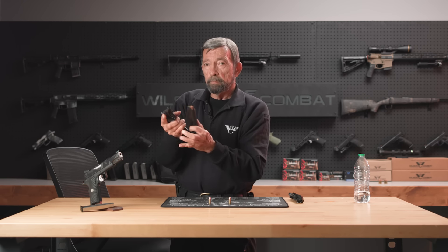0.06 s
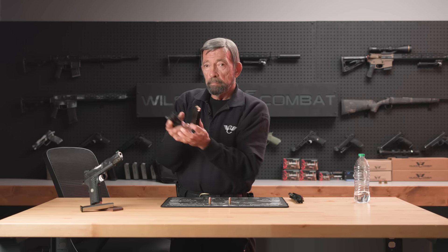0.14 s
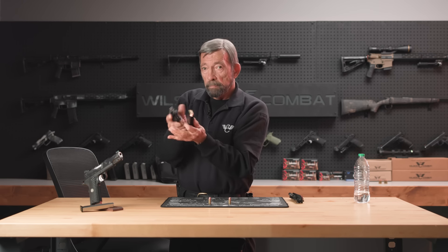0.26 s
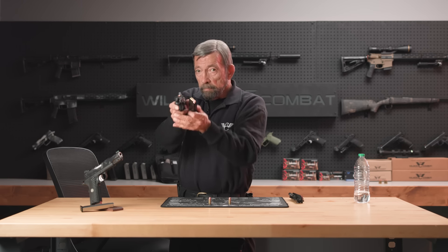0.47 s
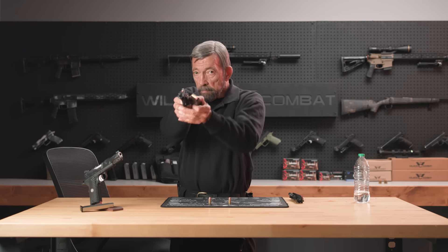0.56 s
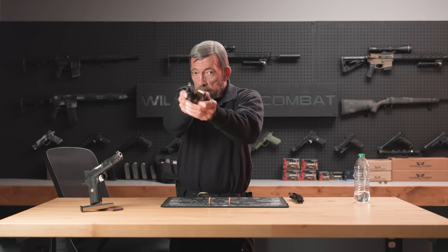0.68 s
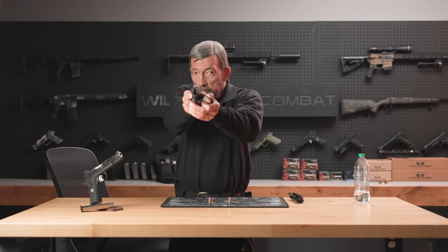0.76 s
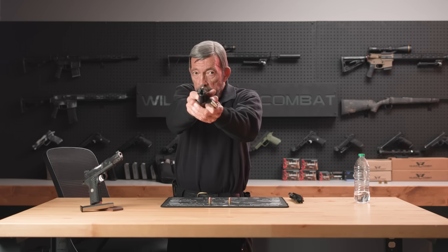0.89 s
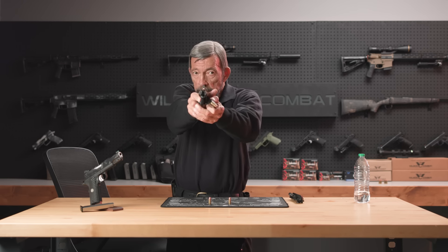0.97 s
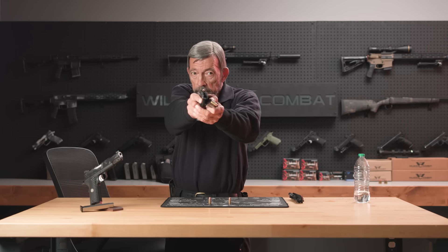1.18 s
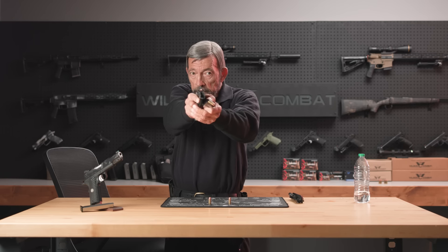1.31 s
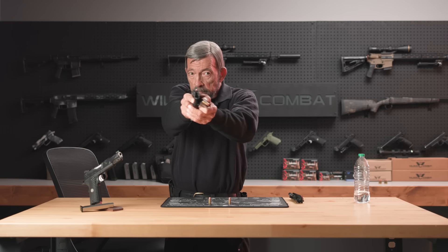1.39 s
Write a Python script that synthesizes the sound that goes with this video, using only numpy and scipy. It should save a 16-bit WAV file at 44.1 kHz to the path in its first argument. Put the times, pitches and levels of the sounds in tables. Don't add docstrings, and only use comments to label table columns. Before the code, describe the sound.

A pistol magazine is pushed in and slapped home with a sharp metallic double clack, indoors

```python
import sys
import numpy as np
from scipy import signal
from scipy.io import wavfile
from scipy.ndimage import uniform_filter1d

SR = 44100
rng = np.random.default_rng(int(sys.argv[2]) if len(sys.argv) > 2 else 0)


def wrap_up_sound(samples):
    columns = np.atleast_2d(samples).T
    tamed = np.clip(columns, -1, 1)
    steps = np.round(tamed * 32767).astype(np.int16)
    wavfile.write(sys.argv[1], SR, steps)


def level_to_linear(level):
    exponent = np.asarray(level, float) / 20
    return 10 ** exponent


N = 63945

# [f/Hz, level/dB]
FLOOR_COLOUR = [(12, -33), (20, -15.5), (74, -2), (228, -26), (410, -11), (446, -15.5), (642, -12.5),
                (698, -15), (16000, -54.5)]
# [f/Hz, t60/s]
HALL_T60 = [(200, .5), (800, 1.025), (2500, 0.81), (5500, 0.78), (9000, 0.48), (15000, 0.38)]
# [f/Hz, level/dB]
HALL_SPECTRUM = [(250, -25), (500, -5.5), (820, 5), (1300, -5), (2100, 2), (3200, 1.5), (6000, 0.5),
                 (8200, -2), (15000, 5.5)]
# [t/s, level/dB]
ARM_MOTION = [(0, -67), (.13, -57), (.3, -57), (.46, -62), (.53, -54), (.63, -56.5), (.72, -60),
              (.87, -60.5), (.93, -62), (.97, -69), (1.2, -71.5), (1.45, -70.5)]
# [f/Hz, level/dB]
RUSTLE_COLOUR = [(350, -35.5), (600, -4), (679, -12.5), (748, -1.5), (1180, -7.5), (8740, -17),
                 (14300, -13.5), (16000, -19.5)]
# [t/s, level/dB]
WEIGHT_SHIFT = [(0, -69), (.12, -59), (.3, -52.5), (.46, -56.5), (.53, -49.5), (.63, -48), (.68, -51),
                (.76, -53.5), (.87, -55), (.95, -56), (1.03, -65), (1.3, -65), (1.45, -60.5)]
# [f/Hz, level/dB]
RUMBLE_COLOUR = [(8.8, -32), (15, 0), (43, -5), (249, -11.5), (409, -8.5), (477, -18.5), (900, -20.5),
                 (1170, -49), (1980, -120)]
# [t/s, level/dB]
SLEEVE_DRAW = [
    (.72, -95),
    (.8, -68.5),
    (.88, -68),
    (.925, -67),
    (.95, -92),
]
# [f/Hz, level/dB]
SLEEVE_DRAW_COLOUR = [(1000, -29.5), (2000, -6.5), (4500, 1), (6500, -4.5), (9000, -14.5), (16000, -13.5)]
# [t/s, peak/dB, length/s]
AIR_PUFFS = [
    (0.142, -33.5, 0.0045),
    (0.189, -36, 0.011),
    (0.2047, -14.5, 0.0024),
    (0.236, -9.5, 0.003),
    (0.309, -35, 0.052),
]
# [t/s, peak/dB, f/Hz, t60/s, start phase/turns]
GRIP_KNOCKS = [(.2045, -9, 420, 0.01, 0.64), (0.203, -13.5, 1463, 0.019, 0.15),
               (.2055, -12, 925, 0.0091, 0.18), (0.2353, -15.5, 340.5, .02, 0.34),
               (0.518, -36.5, 105.6, 0.067, 0.14), (.6028, -33.5, 1530, 0.0095, 0.54),
               (0.6312, -29.5, 1140, 0.0058, 0.1), (0.6321, -31.5, 446, 0.0091, 0.52),
               (.6448, -32, 1480, 0.0091, 0.08), (0.864, -40.5, 50.44, 0.074, 0.19),
               (0.98, -47.5, 168, .03, 0.14), (1.1198, -31.5, 704, 0.005, .1),
               (1.1205, -33, 249, 0.024, 0.76), (0.2144, -18, 950, 0.013, 0.065),
               (1.372, -45.5, 700, 0.026, 0.13)]
# [multiple of fundamental, level/dB]
WELL_HARMONICS = [(1, -1), (2, -10), (3, -14.5), (4, -15.5), (5, -14.5), (6, -9), (7, -16)]
# [t/s, level/dB]
SLIDE_LEVEL = [
    (0, -61),
    (.055, -61),
    (.068, -48),
    (.098, -50),
    (.122, -64.5),
    (.165, -73.5),
    (.19, -44),
    (.2, -41),
    (.205, -79),
]
# [f/Hz, level/dB]
SLIDE_SPECTRUM = [(590, -43), (1000, -7.5), (1730, -2), (3750, -20.5), (11000, 0), (16000, -10.5)]
# [t/s, level/dB, chatter length/s, brightest f/Hz, ring share/dB]
LIGHT_TICKS = [(0.0365, -45.5, 0.0019, 2540, -7), (0.0367, -47, 0.00071, 11100, -13),
               (.0405, -46.5, 0.0037, 1980, -5), (0.082, -48.5, 0.00049, 11400, -10),
               (0.112, -41, 0.0011, 10500, -2.5), (0.1373, -44.5, 0.0016, 2930, -10),
               (0.1409, -33, 0.00136, 4400, -9.5), (0.1404, -32, 0.0012, 11000, -16.5),
               (0.149, -45.5, 0.008, 1900, -4), (0.138, -40, 0.0067, 2400, -6),
               (0.1136, -47, 0.0022, 2450, -13), (0.142, -43, 0.0015, 10700, -6),
               (0.192, -45, .003, 12010, -6.5), (0.6029, -47, 0.0018, 5020, -8),
               (0.6102, -44.5, 0.0014, 5500, -1), (.611, -48, 0.0026, 11000, -14),
               (0.644, -50, 0.0018, 5000, -19), (0.683, -57, 0.003, 3485, -12)]
# [t/s, level/dB, chatter length/s, brightest f/Hz, ring share/dB]
STEEL_CONTACTS = [(0.2012, -16, 0.001, 7000, -12), (0.2033, -14.5, 0.0016, 11520, -6),
                  (0.2046, -22, .002, 4495, -13), (0.2059, -15, 0.0007, 6070, -14),
                  (0.204, -18, .003, 15000, -4.5), (0.2069, -20, .001, 9000, -10.5),
                  (0.2126, -40.5, .002, 2750, -8), (0.2148, -27.5, .001, 3176, -10),
                  (0.2126, -33.5, .003, 13500, -6), (0.2194, -26.5, 0.001507, 11380, -2),
                  (0.2197, -32, 0.002, 5980, -7), (0.2259, -32, .0006, 2765, 2),
                  (0.2348, -17.5, 0.0011, 9300, -7), (0.236, -16.5, 0.001, 12100, -2),
                  (.2364, -24.5, 0.0011, 4250, -7.5), (0.2384, -19, 0.0015, 9800, -5.5),
                  (.239, -22.5, 0.0066, 13500, -8), (.2392, -28, .006, 3398, -10.5),
                  (0.2429, -24.5, .002, 9300, -8), (0.2467, -33, .002, 4500, -7.5),
                  (0.2476, -24.5, .0015, 12410, -7.5), (0.2518, -30.5, .001, 2497, -6.5)]
# [f/Hz, level/dB, t60/s]
STEEL_MODES = [(1465, -5, .014), (2050, -6, .01), (2750, -4, .014), (3700, -6, .014), (4250, -4, .014),
               (5980, -6, .012), (9300, -5, .012), (10100, -3, .012), (10700, -3, .012), (11345, -4, .02),
               (12410, -6, .014), (13800, -8, .012), (15400, -7, .01)]
# [t/s, peak/dB, f/Hz, t60/s, start phase/turns]
STEEL_PINGS = [(.1412, -28, 4250, 0.019, 0), (.2064, -12, 6850, .009, 0), (0.0401, -40, 1220, 0.022, 0),
               (0.2008, -14.5, 2800, .008, 0), (.2036, -9.5, 10500, .012, 0),
               (0.2048, -10.5, 2760, 0.0097, 0.0014), (.2073, -18.5, 4970, .014, 0),
               (.2122, -28, 2805, .016, 0), (0.2358, -14, 10120, .014, 0.0038),
               (0.2359, -7.5, 10070, .012, 0.00039), (0.2367, -15, 9600, .012, 0),
               (.2382, -19, 12410, .03, 0.0014), (0.2474, -20, 2270, .014, 0.00035),
               (0.6449, -38, 3750, 0.011, 0), (0.6833, -46, 3750, 0.014, 0.0021)]
# [f/Hz, peak/dB, t60/s]
FREE_MODES = [(9141, -31.5, 0.26), (11370, -6, 0.027), (12410, -33, .14), (12750, -30.5, .13),
              (12935, -32.5, 0.21), (14740, -36, .15)]

FLOOR_DB = -62
HALL_DB, HALL_RISE_S, HALL_KNOCK_DB = 14.5, 0.059, -44
LINGER_DB, LINGER_S = -9, 0.17
DUCK_S, DUCK_DB, RECOVER_S = 0.22, -14.5, 0.1
SWAY_DB, SWAY_HZ = -44, 16
REBOUND, REBOUND_LONGER = 0.9, 3.5
KNOCK_RISE_TURNS = 0.18
WELL_S, WELL_HZ, WELL_DB = 0.2371, 714.2, -7
WELL_RISE_S, WELL_FALL_S = 0.0015, 0.0022
WELL_TURN, WELL_LAG = 0.042, 0.03
CHATTER_T60_S, CHATTER_RISE_DB, GRIT_DB = 0.008, 0.5, 3.5
WIDTH_OCT, SKIRT_DB, RING_OCT = 0.9, -15, 0.22
SEATED_S = 0.238
EDGE_HZ = 15800


def read(points, hz):
    f, value = np.transpose(points)
    return np.interp(np.log(hz + 1), np.log(f + 1), value)


def curve(points, t):
    return np.interp(t, *np.transpose(points))


def evened(x):
    return x / np.sqrt(np.mean(x ** 2) + 1e-20)


def add(mix, s, sound):
    part = mix[round(s * SR):][:len(sound)]
    part += sound[:len(part)]


def noise(colour, size, patch_db=0., flicker_db=0.):
    frames = 4 * N // size + 5
    hz = np.fft.rfftfreq(size, 1 / SR)
    real, imag, patches = rng.standard_normal((frames, len(hz), 3)).T
    patches = uniform_filter1d(patches, size=8, axis=0)
    patches = evened(uniform_filter1d(patches, size=6, axis=1))
    flicker = rng.standard_normal(frames)
    field_db = read(colour, hz)[:, None] + patch_db * patches + flicker_db * flicker
    spectra = (real + 1j * imag) * level_to_linear(field_db)
    return evened(signal.istft(spectra, nperseg=size, noverlap=3 * size // 4)[1][:N])


def room_tone():
    return level_to_linear(FLOOR_DB) * noise(FLOOR_COLOUR, size=2048, patch_db=1.0)


def hall(x):
    taps = np.zeros(SR + SR // 4)
    at = np.arange(200, len(taps) - 10, 10)
    taps[at + rng.integers(0, 10, len(at))] = rng.choice([-1., 1.], len(at))
    hz, t, z = signal.stft(taps, SR, nperseg=512)
    decay_db = read(HALL_SPECTRUM, hz)[:, None] - 60 * t / read(HALL_T60, hz)[:, None]
    z = z * level_to_linear(decay_db) * (1 - np.exp(-t / HALL_RISE_S))
    tail = signal.istft(z, SR, nperseg=512)[1]
    return signal.fftconvolve(x, tail / np.linalg.norm(tail))[:N]


def lingering_hall(t):
    response = hall(1. * (t == 0))
    return level_to_linear(LINGER_DB) * np.roll(response, -round(LINGER_S * SR)) * (t < 1)


def sleeve_rustle(t):
    return level_to_linear(curve(ARM_MOTION, t)) * noise(RUSTLE_COLOUR, size=1024, patch_db=1.5, flicker_db=1.5)


def shirt_rumble(t):
    return level_to_linear(curve(WEIGHT_SHIFT, t)) * noise(RUMBLE_COLOUR, size=1024, patch_db=3.0, flicker_db=1.5)


def drawn_sleeve(t):
    return level_to_linear(curve(SLEEVE_DRAW, t)) * noise(SLEEVE_DRAW_COLOUR, size=256, patch_db=1.0, flicker_db=0.5)


def ducking(t):
    return level_to_linear(DUCK_DB * (t > DUCK_S) * np.exp(-((t - DUCK_S) / RECOVER_S) ** 2))


def air_sway(t):
    return level_to_linear(SWAY_DB) * np.cos(2 * np.pi * SWAY_HZ * (t - .072)) * np.clip((.2 - t) / .05, 0, 1)


def puff(peak_db, length_s):
    u = np.arange(SR // 5) / SR / length_s
    v = u / REBOUND_LONGER
    rise = u * np.exp(-u)
    rebound = REBOUND / REBOUND_LONGER * v * np.exp(-v)
    return level_to_linear(peak_db) * np.e * (rise - rebound)


def knock(peak_db, hz, t60_s, turn):
    t = np.arange(0, t60_s * 1.5, 1 / SR)
    rise = 1 - np.exp(-(t * hz / KNOCK_RISE_TURNS) ** 2)
    return level_to_linear(peak_db - 60 * t / t60_s) * rise * np.sin(2 * np.pi * (hz * t + turn))


def well():
    t = np.arange(N) / SR - WELL_S
    shape = np.exp(-(t / np.where(t < 0, WELL_RISE_S, WELL_FALL_S)) ** 2)
    swings = np.zeros(N)
    for k, db in WELL_HARMONICS:
        turns = round(k) * (WELL_HZ * t + WELL_TURN + WELL_LAG * k)
        swings += level_to_linear(db) * np.sin(2 * np.pi * turns)
    return level_to_linear(WELL_DB) * shape * swings


def magazine_slide(t):
    return level_to_linear(curve(SLIDE_LEVEL, t)) * noise(SLIDE_SPECTRUM, size=256, patch_db=-3.0, flicker_db=-3.5)


def contact(level_db, length_s, hz, ring_db):
    carrier, roughness = rng.standard_normal((2, 1024))
    t = np.arange(1024) / SR
    rise_db = CHATTER_RISE_DB * np.minimum(t / length_s, 1)
    fade_db = rise_db - 60 * np.maximum(t - length_s, 0) / CHATTER_T60_S
    grit = carrier * level_to_linear(GRIT_DB * roughness + fade_db) * np.minimum(t * 5000, 1)

    grid_hz = np.linspace(1, SR / 2, 33)
    hump = np.exp(-(np.log2(grid_hz / hz) / WIDTH_OCT) ** 2)
    hump += level_to_linear(SKIRT_DB) * grid_hz / (grid_hz + 2500)
    direct = signal.fftconvolve(grit, signal.firwin2(41, np.linspace(0, 1, 33), hump))[20:]

    modes = np.zeros(len(t))
    for f, db, t60_s in STEEL_MODES:
        nearness = np.exp(-(np.log2(f / hz) / RING_OCT) ** 2)
        modes += nearness * level_to_linear(db - 60 * t / t60_s) * np.sin(2 * np.pi * f * t)
    ring = signal.fftconvolve(grit, modes)

    head = round((length_s + 0.0012) * SR)
    ring *= level_to_linear(ring_db) / np.std(ring[:head])
    add(ring, 0, direct / np.std(direct[:head]))
    return level_to_linear(level_db) * ring


def free_ring():
    t = np.arange(SR // 2) / SR
    modes = sum(level_to_linear(db - 60 * t / t60_s) * np.sin(2 * np.pi * hz * t) for hz, db, t60_s in FREE_MODES)
    return np.minimum(t / .002, 1) * modes


def scene():
    t = np.arange(N) / SR
    bed = room_tone() + lingering_hall(t) + sleeve_rustle(t) + shirt_rumble(t) + drawn_sleeve(t)
    bed *= ducking(t)

    air = air_sway(t)
    for s, *settings in AIR_PUFFS:
        add(air, s, puff(*settings))

    grip = well()
    for s, *settings in GRIP_KNOCKS:
        add(grip, s, knock(*settings))

    steel = magazine_slide(t)
    clicks = np.zeros(N)
    for table in (LIGHT_TICKS, STEEL_CONTACTS):
        for s, level_db, *settings in table:
            add(steel, s, contact(level_db, *settings))
            add(clicks, s, level_to_linear([level_db]))
    for s, *settings in STEEL_PINGS:
        add(steel, s, knock(*settings))
    add(steel, SEATED_S, free_ring())

    echo = level_to_linear(HALL_DB) * hall(clicks + level_to_linear(HALL_KNOCK_DB) * grip)
    return (steel + grip + air + bed + echo)[None]


def roll_off(x):
    return signal.sosfilt(signal.butter(12, 16960, fs=SR, output="sos"), x)


def record(dry):
    x = np.tanh(dry / 1.358) * 1.27
    lowpass = signal.firwin(255, EDGE_HZ, window=("kaiser", 6), fs=SR)
    x = signal.oaconvolve(x, lowpass[None], "same")
    return roll_off(x)


dry = scene()
out = record(dry)
wrap_up_sound(out)
```